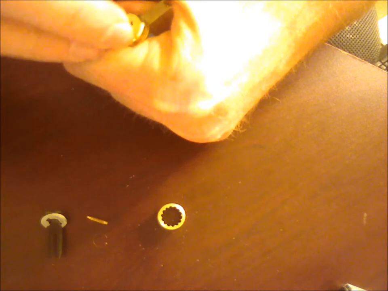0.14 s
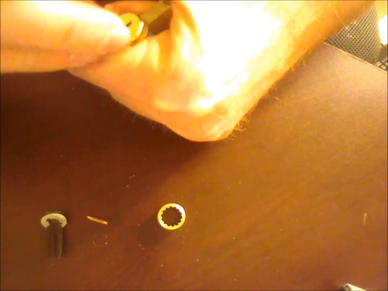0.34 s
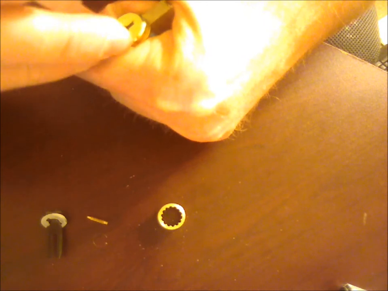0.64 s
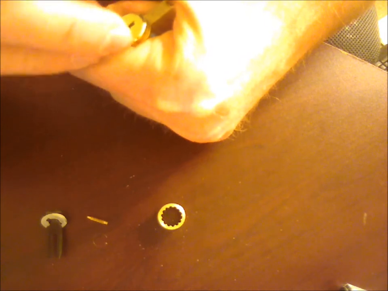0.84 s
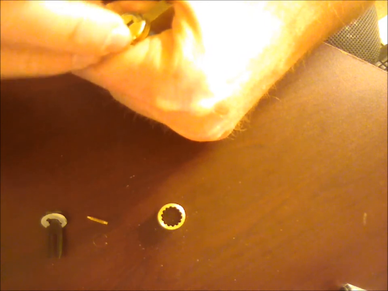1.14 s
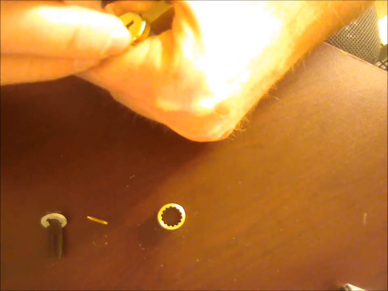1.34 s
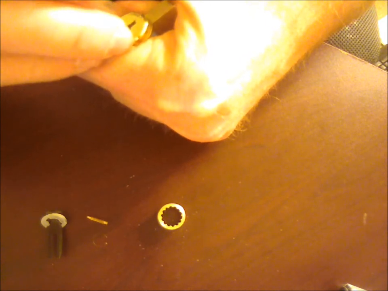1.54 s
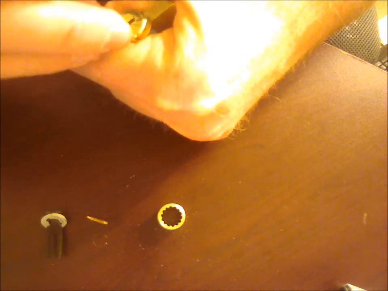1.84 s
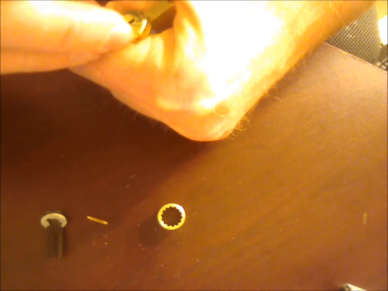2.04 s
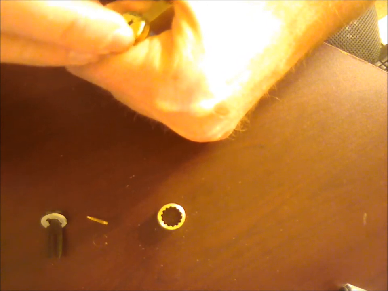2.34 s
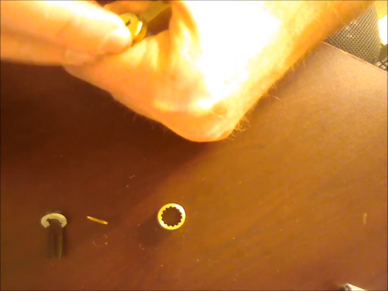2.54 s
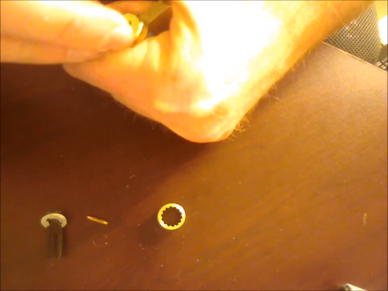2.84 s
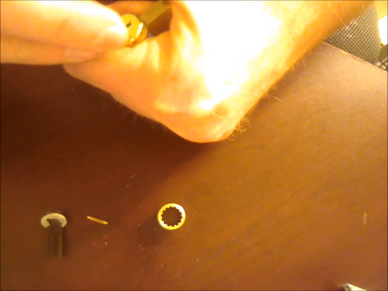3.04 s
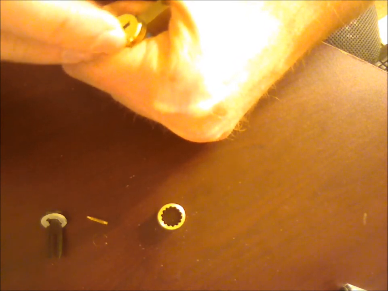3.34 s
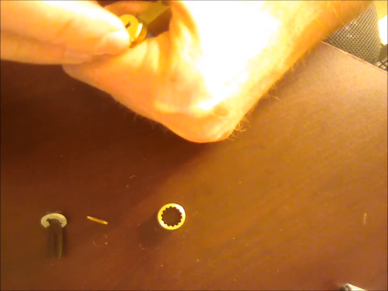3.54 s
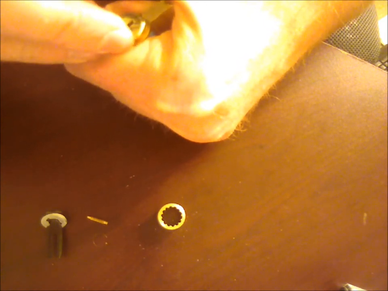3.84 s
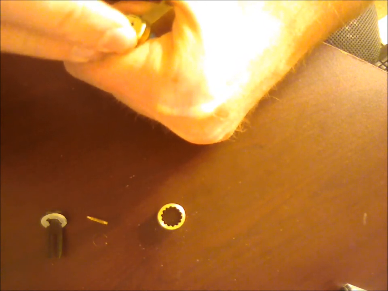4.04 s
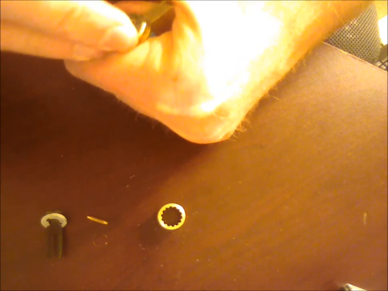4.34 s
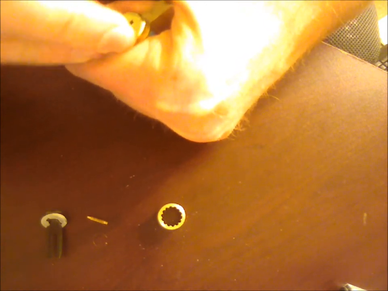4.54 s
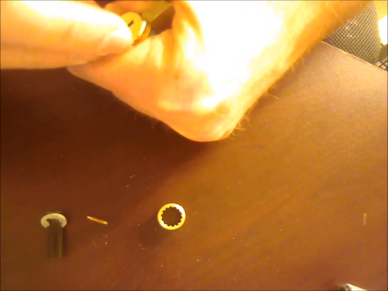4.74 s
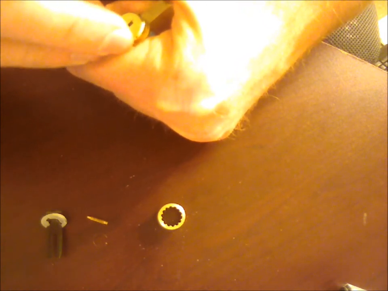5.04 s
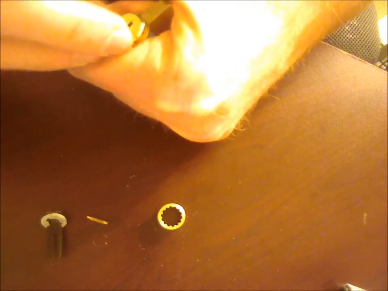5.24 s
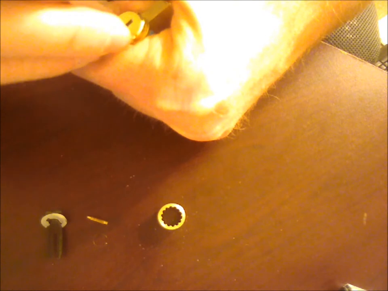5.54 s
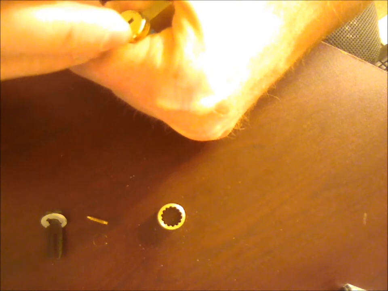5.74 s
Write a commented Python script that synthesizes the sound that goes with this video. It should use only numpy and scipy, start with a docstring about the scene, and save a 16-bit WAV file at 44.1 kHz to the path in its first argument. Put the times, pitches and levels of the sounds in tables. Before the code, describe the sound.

Tiny, sharp lock pin clicks come in irregular clusters, with faint scraping, a few soft table bumps and a quiet fan humming behind.

```python
"""A small room, at a wooden table, with a narrow-band desk microphone close to the hands.
A fan hums behind: air noise, droning resonances, a thin motor whine. Up close, a pick and a
tension tool work inside a small hand-held metal lock. Pins click in tight clusters, ringing the
damped metal and rattling the springs; between them the pick scrapes faintly and the fingers rub.
Now and then the hand bumps the table."""
import sys
import numpy as np
from scipy import signal
from scipy.fft import rfft, irfft
from scipy.io import wavfile

SR = 44100
rng = np.random.default_rng(int(sys.argv[2]) if len(sys.argv) > 2 else 0)


def master(y):
    """Save y as 16-bit WAV."""
    cut = np.clip(np.atleast_2d(y).T, -1, 1)
    pcm = np.round(cut * 32767)  # scale
    wavfile.write(sys.argv[1], SR, pcm.astype(np.int16))


N = 260631
TIME = np.arange(N) / SR

# spectrum of the fan's air noise: f/Hz, relative level/dB
FAN_AIR = [(20, -33), (48, -28), (62, -12), (98, -12), (132, 1), (195, -3), (235, 2.5), (300, -3),
           (700, -9), (1150, -13.5), (1650, -21.5), (2500, -28), (3000, -32), (4300, -39), (6500, -42.5),
           (7200, -69)]
# room and table resonances stirred by the fan: f/Hz, nominal width/Hz, rms level/dB
FAN_DRONES = [(226.5, 4.5, -63.5), (268, 19, -71.5), (451.5, 18, -71)]
# whine of the fan motor: f/Hz, rms level/dB
FAN_WHINE = [(774.7, -73.5), (1380, -78), (2760, -87.5), (3680, -94), (4640, -93), (5520, -94.5)]
# faint tones that come and go in the hum: middle t/s, length/s, peak level/dB, f/Hz
HUM_SWELLS = [(3.645, 0.8, -67.5, 568), (4.76, 0.62, -67, 552.5)]
# decay of the room: f/Hz, t60/s
ROOM_DECAY = [(200, 0.28), (2000, 0.13), (3200, 0.23), (6000, 0.095), (8000, 0.045)]
# the hand bumping the table: t/s, level/dB, f/Hz, t60/s
TABLE_BUMPS = [(0.789, -42, 130, 0.096), (1.539, -53.5, 146, 0.18), (1.786, -42, 231, 0.18),
               (1.826, -46, 233.7, 0.32), (1.856, -44, 219.7, 0.15), (3.17, -38, 214.5, 0.1),
               (4.972, -44.5, 169, 0.099), (5.855, -47, 161, 0.17)]
# fingers sliding over the metal: middle t/s, length/s, level/dB
FINGER_RUBS = [(1.155, 0.12, -74.5), (2.96, 0.19, -86)]
# main ring of the steel pick: f/pick pitch, width/Hz, relative level/dB
PICK_MODES = [(0.983, 520, 2.5), (1.032, 580, 0)]
# modes of the lock body and of its pin chambers: f/chamber pitch, width/Hz, relative level/dB
BODY_MODES = [(.22, 350, -19.5), (.46, 420, -14.5), (.63, 370, -2), (.72, 380, 1)]
CHAMBER_MODES = [(.99, 270, 1.5), (1.04, 300, -6)]
# modes of the pick's tip and of the tension tool: f/Hz, width/Hz, relative level/dB
TIP_MODES = [(6900, 720, -4), (7550, 700, -7)]
TOOL_MODES = [(3520, 380, -11), (4580, 420, -1)]
# modes of the rattling springs and tension tool: f/Hz, width/Hz, relative level/dB
RATTLE_MODES = [(2198, 800, -5.5), (3150, 600, -9.5), (5000, 680, -10), (5630, 700, -2.5), (6550, 900, 1),
                (8950, 900, 1.5)]
# spots where the sliding tip catches: pick f/Hz, chamber f/Hz, shank f/Hz
CATCH_SPOTS = [(5900, 2950, 6500), (6200, 3100, 5550), (6450, 4000, 3600)]
# the pick sliding over pins: middle t/s, length/s, relative level/dB
PICK_STROKES = [(0.82, 0.079, -76), (1.024, 0.12, -74), (1.2, 0.08, -81), (1.549, 0.062, -69.5),
                (1.675, 0.08, -67.5), (1.775, 0.04, -56), (1.8, 0.037, -44.5), (2.007, 0.12, -80),
                (2.298, 0.059, -80), (2.423, 0.067, -75), (2.958, 0.091, -75.5), (3.981, 0.099, -76.5),
                (4.159, 0.06, -71.5), (5.14, 0.067, -68), (5.333, 0.21, -76.5), (5.49, 0.088, -77),
                (5.777, 0.082, -75.5), (5.892, 0.029, -61)]
# pin clicks: t/s, pick ring level/dB, pick f/Hz, chamber f/Hz, shank f/Hz,
# then level/dB relative to the pick's ring for body, chamber, tension tool, shank, tip
PIN_CLICKS = [(0.3514, -65, 6400, 3260, 5230, -26, -16, -28, -15, -12),
              (0.5902, -73, 6150, 3180, 5530, -16, -10, -29, -24, -20),
              (0.7761, -66, 6700, 3220, 5600, -2, -5, -20, -5, -14),
              (0.7828, -51, 6160, 3130, 5770, -6.5, -10.5, -31, -4, -15),
              (0.9627, -51, 6300, 3050, 5170, -8, -9.5, -30, -5.5, -10),
              (0.9632, -49, 6400, 3070, 5150, -10, -12.5, -28, -5, -8),
              (1.2489, -51, 6410, 3300, 4980, -24, -14, -20, -5.5, -8),
              (1.25, -53.5, 6530, 3410, 5100, -29, -13, -20, -5, 2),
              (1.2746, -56.5, 6340, 3120, 5270, -32, -24, -33, -17, -15),
              (1.529, -66, 6100, 3110, 5580, -21, -33, -35, -13, -26),
              (1.547, -71, 6320, 2810, 5430, -22, -17, -27, 2, -18),
              (1.5544, -53, 6120, 2870, 5450, -38, -33, -35, -20, -25),
              (1.677, -76, 6320, 3160, 5280, -19, -18, -24, -18, -19),
              (1.7521, -42.0, 6460, 3230, 5150, -18, -18.5, -32, -13, -10),
              (1.762, -67, 6140, 3130, 5140, -13, -19, -27.5, -10, 0),
              (1.7865, -34.5, 6580, 3090, 5280, -8.5, -3.5, -34, -5, -6),
              (1.8232, -46, 6330, 3310, 5500, -16, -11.5, -20, -5.5, -8),
              (1.828, -35.5, 6350, 3165, 5220, -10.5, -12.5, -23.5, -9, -5.5),
              (1.836, -61, 6400, 3124, 5310, -0.5, -13.5, -19, -4.5, -4),
              (1.895, -62, 6250, 3320, 5520, -26.5, -21, -30, -20, -14),
              (2.1082, -70, 6280, 3220, 5330, -20.5, -13, -30, -17, -15),
              (2.119, -75, 6250, 3170, 5550, -6, -13, -28, -10, -20),
              (2.298, -77, 5920, 3160, 5080, -14, -16, -25.5, -23, -16),
              (2.421, -76.5, 6400, 3170, 5530, -18, -23, -29, -26, -19),
              (2.4595, -53, 6040, 3450, 5290, -23, -16, -25, -12.5, -8.5),
              (2.4657, -66, 6400, 3080, 5210, -22, -14.5, -22, -14, -2),
              (2.564, -77, 6460, 3200, 5600, -8, -18, -28, -6, -15),
              (2.572, -69, 6400, 2970, 5460, -24, -16, -29, -8, -18),
              (3.2002, -58.5, 6240, 2810, 5350, -13, -21.5, -34.5, -14, -18),
              (3.2077, -63, 6600, 3300, 5230, -17, -18, -36, -3, -16),
              (3.98, -81, 6050, 3190, 5230, -8, 3, -17, -16, -21),
              (4.1164, -35.0, 6100, 3420, 5240, -15.5, -23.5, -14, -21, -15.5),
              (4.4386, -58, 6280, 3120, 5470, -20, -30, -35, -27, -21),
              (4.449, -59.5, 6430, 3330, 5000, -21, -29, -34, -19.5, -1),
              (4.745, -54, 6360, 3300, 5570, -27, -30, -20, -10.5, -14),
              (5.1138, -51.5, 6730, 3000, 4980, -9.5, -17, -31.5, -14.5, -13),
              (5.143, -69, 6120, 3120, 5300, -14, -21, -23, -21, -17),
              (5.191, -44.0, 6140, 3080, 5380, -8.5, -11.5, -33, 0, -19),
              (5.203, -59.5, 6650, 3340, 5390, -17, -25, -27, 0, -9),
              (5.2174, -55, 6430, 3180, 5360, -23, -20, -31, -19, -17),
              (5.5953, -55.5, 6570, 3300, 5640, -34, -31, -33.5, -7, -20),
              (5.607, -61.5, 6130, 3210, 5370, -28, -22, -27, -11, -9),
              (5.6118, -59.5, 6740, 3180, 5300, -33, -28, -32, -18, -0.5),
              (5.698, -69.5, 6460, 3190, 5420, -20, -23, -31, -13, -16.5),
              (5.7028, -69.5, 6210, 3250, 5630, -18, -12, -31, -22, -19),
              (5.7686, -74, 6230, 3130, 5030, -20, -30, -28, -25, -14),
              (5.7726, -67, 6400, 3080, 5060, -23, -30, -29, -26, -18),
              (5.8428, -39.5, 6140, 3120, 5130, -15.5, -23, -34, -16, -8),
              (5.853, -26.5, 6110, 3230, 5150, -17, -16, -37, -14, -10.5),
              (5.8884, -41, 6130, 3260, 5370, -25, -20, -34, -7, -12)]

USUAL_CLICK_DB = -50  # chatter, skid and rattle scale from a click of this level


def amp(db):
    """Decibels to gain."""
    return 10 ** (np.asarray(db) / 20)


def unit_rms(x):
    """Scales to rms 1."""
    return x / np.sqrt(np.mean(x ** 2) + 1e-20)


def curve(points, hz):
    """Joins (Hz, value) points on a log-frequency axis."""
    f, value = np.transpose(points)
    return np.interp(np.log(hz + 1), np.log(f), value)


def add(mix, s, sound):
    """Mixes a sound in at time s."""
    part = mix[max(round(s * SR), 0):][:len(sound)]
    part += sound[:len(part)]


def swell(t, length):
    """A bell-shaped rise and fall around t = 0."""
    return np.exp(-(2 * t / length) ** 2)


def wander(hz):
    """Slow random motion below hz, of rms 1."""
    slow = np.fft.rfftfreq(N, 1 / SR) < hz
    return unit_rms(irfft(rfft(rng.standard_normal(N)) * slow, N))


def grains(per_s, spread_db):
    """A random train of tiny contacts of uneven strength."""
    size = amp(spread_db * np.minimum(rng.exponential(1, N), 3))
    return rng.choice([-1, 1], N) * size * (rng.random(N) < per_s / SR)


def resonate(x, hz, width):
    """One decaying mode of gain 1."""
    r = np.exp(-np.pi * width / SR)
    c = r * np.cos(2 * np.pi * hz / SR)
    return 2 * (1 - r) * signal.lfilter([1, -c], [1, -2 * c, r * r], x)


def ring(x, modes, scale=1):
    """Sounds a set of modes at rms 1; each filters twice, leaving deep valleys between them."""
    return unit_rms(sum(amp(db) * unit_rms(resonate(resonate(x, f * scale, width), f * scale, width))
                        for f, width, db in modes))


def fan(air_db=-59.5, waver=.0012, flutter=0.2):
    """The bed of room tone: steady fan air, droning resonances and a wavering motor whine."""
    air_spectrum = amp(curve(FAN_AIR, np.fft.rfftfreq(N, 1 / SR)))
    air = unit_rms(irfft(rfft(rng.standard_normal(N)) * air_spectrum, N))
    drone = sum(amp(db) * ring(rng.standard_normal(N), [(hz, 2 * width, 0)])
                for hz, width, db in FAN_DRONES)
    motor_time = np.cumsum(1 + waver * wander(hz=6.6)) / SR
    whine = sum(amp(db) * unit_rms((1 + flutter * wander(hz=13)) * np.sin(2 * np.pi * hz * motor_time))
                for hz, db in FAN_WHINE)
    return amp(air_db) * air + drone + whine


def hum_swells():
    """Back in the hum, a faint tone swells and fades, twice."""
    return sum(amp(db) * np.sin(2 * np.pi * hz * TIME) * swell(TIME - s, length)
               for s, length, db, hz in HUM_SWELLS)


def room(x, tail_db=-20, near_db=-18, near_t60=0.044, near_per_s=2500, onset_s=.003):
    """Close perspective: direct sound, quick scatter off table and hand, then a short room tail."""
    t = np.arange(SR // 2) / SR
    tail, near = rng.standard_normal((2, len(t)))
    hz, frame_s, spectrum = signal.stft(tail, SR, nperseg=256)
    decay = amp(-60 * frame_s / curve(ROOM_DECAY, hz)[:, None])
    tail = signal.istft(spectrum * decay, SR)[1][:len(t)]
    near = near * (rng.random(len(t)) < near_per_s / SR) * amp(-60 * t / near_t60)
    onset = 1 - np.exp(-(t / onset_s) ** 4)
    tail, near = tail * onset, near * onset
    echo = amp(tail_db) * tail / np.linalg.norm(tail) + amp(near_db) * near / np.linalg.norm(near)
    return x + signal.fftconvolve(x, echo)[:N]


def table_bumps(rise_s=0.0086):
    """The soft hand sets the table top ringing, low and brief."""
    out, t = np.zeros(N), np.arange(SR // 2) / SR
    for s, db, hz, t60 in TABLE_BUMPS:
        envelope = amp(db - 60 * t / t60) * (1 - np.exp(-t / rise_s))
        add(out, s, envelope * np.sin(2 * np.pi * hz * t))
    return out


def finger_rubs(hz=3900, width_hz=2200):
    """A fingertip slides over the metal with a soft hiss."""
    hiss = ring(rng.standard_normal(N), [(hz, width_hz, 0)])
    return hiss * sum(amp(db) * swell(TIME - s, length) for s, length, db in FINGER_RUBS)


def metal(x, pick_hz, chamber_hz, shank_hz, body_db, chamber_db, tool_db, shank_db, tip_db):
    """Pick, tension tool and lock ring together; the contact spot sets their pitch and balance."""
    shank_modes = [(shank_hz, 320, 0)]  # the fingers damp the shank into one broad resonance
    parts = [(BODY_MODES, chamber_hz, body_db), (CHAMBER_MODES, chamber_hz, chamber_db),
             (TOOL_MODES, 1, tool_db), (shank_modes, 1, shank_db), (TIP_MODES, 1, tip_db)]
    pick = ring(x, PICK_MODES, pick_hz)
    return pick + sum(amp(db) * ring(x, modes, scale) for modes, scale, db in parts)


def pick_scrapes(trim_db=-2, uneven_db=2.0, skid_lag_s=.002, skid_s=0.018, skid_db=-65, growth=0.3566):
    """Tiny slips of the tip ring the metal on each stroke, and as it skids over a clicking pin."""
    balance = dict(body_db=-13.5, chamber_db=-13.5, tool_db=-27, shank_db=-12.5, tip_db=-11.5)
    slips = sum(metal(grains(per_s=900, spread_db=2), *spot, **balance) for spot in CATCH_SPOTS)
    skids = [(s + skid_lag_s, skid_s, skid_db + growth * (db - USUAL_CLICK_DB))
             for s, db, *_ in PIN_CLICKS]
    power = np.zeros(N)
    for s, length, db in PICK_STROKES + skids:
        t = np.arange(-length, length, 1 / SR)
        add(power, s - length, (amp(db + trim_db) * swell(t, length)) ** 2)
    grip = amp(uneven_db * wander(hz=39.0))
    return np.sqrt(power) * unit_rms(grip * slips)


def spring_rattle(usual_db=-72, growth=.8, t60=.09, rise_s=.001):
    """Each click shakes springs and tension tool into a short rattle that grows less than the click."""
    envelope, t = np.zeros(N), np.arange(SR // 4) / SR
    for s, db, *_ in PIN_CLICKS:
        start_db = usual_db + growth * (db - USUAL_CLICK_DB)
        add(envelope, s, amp(start_db - 60 * t / t60) * (1 - np.exp(-t / rise_s)))
    rattle = sum(amp(db) * ring(grains(per_s=6100, spread_db=0.5), [(hz, width, 0)])
                 for hz, width, db in RATTLE_MODES)
    return envelope * unit_rms(rattle)


def pin_clicks(usual_chatter_s=0.00018, shortening=0.02, grit=.6, lead_s=.001, samples=700):
    """In the foreground, each pin chatters for about a millisecond; the hand soon damps the ring."""
    out, t = np.zeros(N), np.arange(samples) / SR
    for s, db, *colour in PIN_CLICKS:
        chatter_s = usual_chatter_s * amp(-shortening * (db - USUAL_CLICK_DB))
        age = t / chatter_s
        contacts = rng.standard_normal(samples) * np.exp(grit * rng.standard_normal(samples))
        chatter = contacts * age ** 2 * np.exp(-age)
        add(out, s - lead_s, amp(db) * metal(chatter, *colour))  # contact comes before the ring peaks
    return out


def scene():
    """The lock close up in its room, over the table bumps and the fan, in mono."""
    lock = pin_clicks() + spring_rattle() + pick_scrapes() + finger_rubs()
    return (room(lock) + table_bumps() + fan() + hum_swells())[None]


def record(dry, mic_edge_hz=7457, leak_db=-28, leak_hz=10000, hiss_db=-93.0, limit_hz=15700):
    """The desk microphone passes little above its edge; faint converter hiss and a band limit follow."""
    mic_filter = signal.firwin(141, mic_edge_hz, fs=SR)
    narrow = signal.oaconvolve(dry, mic_filter[None], "same")
    leak = signal.lfilter(*signal.butter(2, leak_hz, fs=SR), dry - narrow)
    hiss = amp(hiss_db) * rng.standard_normal(dry.shape)
    band_limit = signal.firwin(255, limit_hz, window=("kaiser", 8), fs=SR)
    return signal.oaconvolve(narrow + amp(leak_db) * leak + hiss, band_limit[None], "same")


dry = scene()
out = record(dry)
master(out)
```